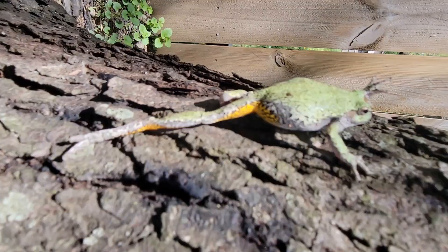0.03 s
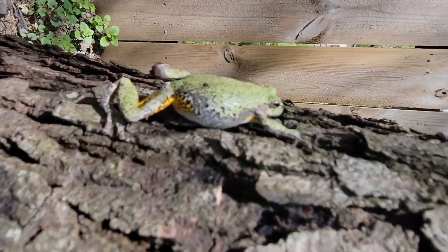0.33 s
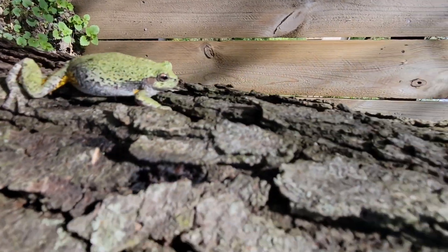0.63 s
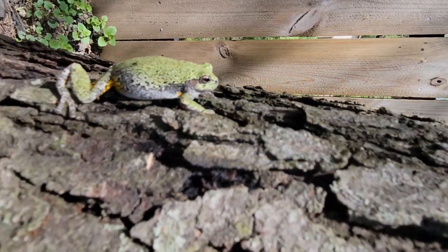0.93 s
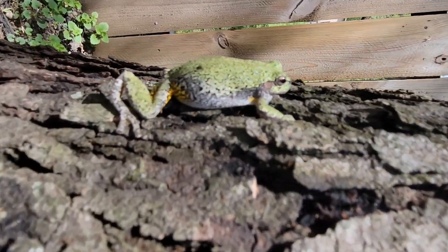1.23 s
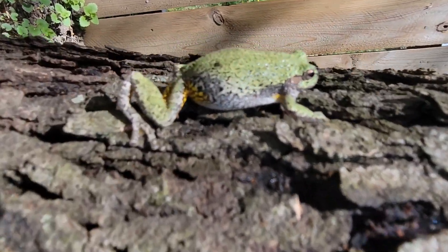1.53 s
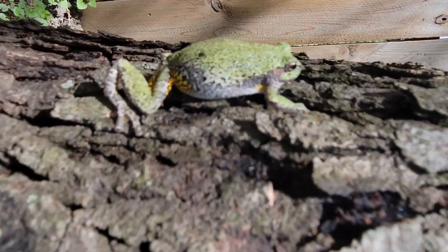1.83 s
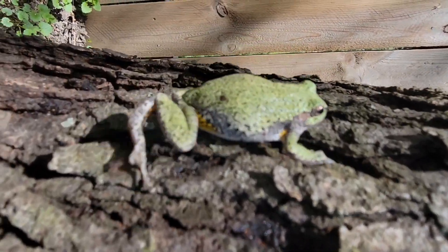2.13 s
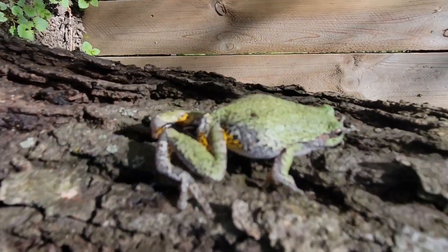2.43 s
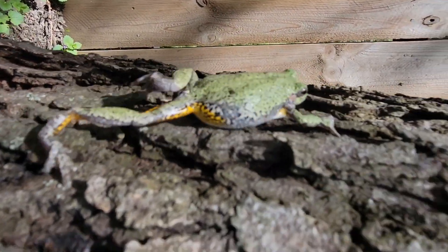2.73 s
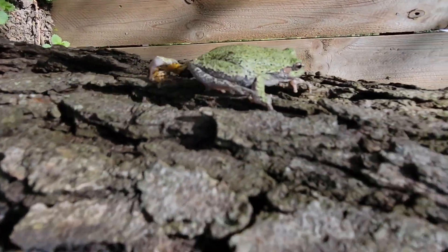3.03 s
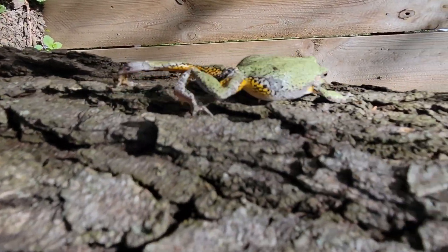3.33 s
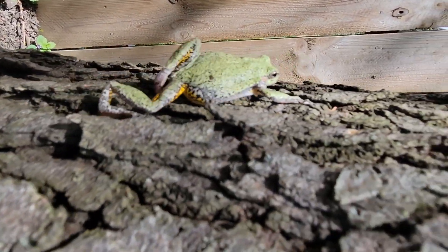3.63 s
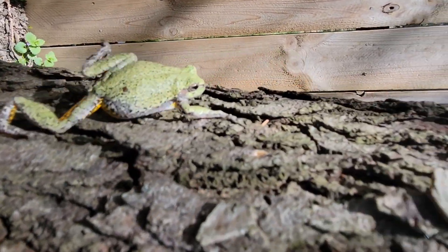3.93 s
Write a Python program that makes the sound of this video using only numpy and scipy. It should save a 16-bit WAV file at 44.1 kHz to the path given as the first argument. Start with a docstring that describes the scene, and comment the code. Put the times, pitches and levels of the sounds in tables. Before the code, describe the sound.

An air conditioner hums steadily in a quiet yard, with far traffic and faint birds.

```python
"""A steady, fluttering hum fills a quiet back yard: a machine behind a fence, probably an air
conditioner, its fan shaking the hum while motor tones beat and the casing softly rattles.
Underneath, a low engine-like drone swells and fades on a bed of distant traffic, and a soft hiss,
perhaps leaves, creeps in. Short chirps, mostly far birds, and one faint, falling whistle echo on the
right. Up close, a hand on the microphone makes a few tiny ticks and one light scuff."""
import sys
import numpy as np
from scipy import signal
from scipy.fft import rfft, irfft
from scipy.io import wavfile

SR = 44100
rng = np.random.default_rng(int(sys.argv[2]) if len(sys.argv) > 2 else 0)


def put_to_file(sound):
    """Save the sound as 16-bit audio at rate SR, in the file named by the first command-line argument."""
    columns = np.atleast_2d(sound).T  # one column per channel
    safe = np.clip(columns, -1, 1)
    whole_steps = np.round(safe * 32767)
    wavfile.write(sys.argv[1], SR, whole_steps.astype(np.int16))


N = 176400
T = np.arange(N) / SR
F = np.arange(N // 2 + 1) * SR / N + 1e-3  # Hz, kept just above zero

# Tone colour of the traffic rumble: frequency_hz, relative_level_db
RUMBLE_SPECTRUM = [(20, -20), (38, -8.5), (55, 2), (78, 5), (110, -4), (170, -6.5), (210, -10), (285, -2.5),
                   (370, -12), (520, -18.5), (740, -23.5), (890, -35), (1100, -35.5), (2000, -55)]
# Airy traffic wash on each side: frequency_hz, left_density_db, right_density_db
WASH_SPECTRUM = [(20, -100, -100), (121, -87, -86.5), (280, -79, -83.5), (560, -83.5, -84.5),
                 (970, -87.5, -89.5), (1410, -91, -89), (2220, -96.5, -93.5), (2860, -95.5, -92),
                 (3487, -101, -101), (4640, -113.5, -123), (5500, -118.5, -129), (7700, -114, -121),
                 (9300, -123.5, -128), (12200, -123.5, -118.5), (15500, -125, -124.5)]
# Swells of the low drone: time_s, level_db
DRONE_SWELLS = [(.08, -38.5), (.42, -37.5), (.8, -45.5), (.97, -48), (1.6, -43), (2.0, -54), (2.3, -42),
                (2.6, -37), (3.1, -43.5), (3.25, -55), (3.42, -40.5), (4, -54.5)]
# Whistles before the echo: start_s, length_s, pitch_hz, slide_hz_per_s, level_db
# The row at 3.35 s is a faint, falling whistle; the others are far birds.
WHISTLES = [(.245, 0.11, 2462, -400, -71), (.35, 0.032, 2444, 2, -66.5), (.395, 0.038, 2870, 1201, -64.5),
            (.438, 0.03, 2890, -1200, -66.5), (.51, .04, 2800, -0.5, -73), (0.651, .04, 2800, 0.5, -74),
            (2.587, .04, 3020, -0.5, -66.5), (2.661, 0.034, 2797, -3000, -61.5), (2.7, .035, 3040, 1, -64),
            (2.762, 0.028, 3010, -0.5, -69), (2.845, .08, 2774, -1800, -67),
            (3.004, 0.041, 2640, -800, -67), (3.215, 0.042, 3070, 0, -66.5),
            (3.258, 0.059, 3060, -300, -56.5), (3.35, 0.11, 2650, -600, -66),
            (3.423, .03, 3050, -1.5, -66.5)]
# Handling ticks: start_s, gain_db, brightness_hz, left_minus_right_db
HANDLING_TICKS = [(.1645, -52, 12500, -1), (.352, -60, 8800, 10), (.889, -56, 13000, -7),
                  (1.216, -50, 13000, -7), (1.257, -57, 13000, -9), (1.798, -65, 11000, 3),
                  (2.206, -59, 13000, -6), (2.234, -53, 13000, -10), (3.274, -60, 13500, 4),
                  (3.4859, -57, 12800, -10), (3.712, -63, 14000, 0), (3.7665, -52, 12800, -7)]
# Steady tones of the motor and casing: pitch_hz, level_db
MOTOR_TONES = [(58.2, -55), (73.5, -51), (80.8, -48.5), (84.5, -60.5), (117.3, -62.5), (147.6, -66),
               (190.6, -56.5), (234.8, -57), (243.3, -57.5), (281.7, -56.5), (293.6, -60.5), (300.9, -66.5),
               (320.1, -60), (448.1, -67), (486.5, -63.5), (495.3, -65), (505.7, -63.5), (525, -65.5),
               (601.8, -76.5), (710.5, -70.5), (719.3, -73), (806.6, -83), (1011.5, -82.5), (1055, -79.5)]

RUMBLE_DB, WASH_SWELL_DB, WASH_FLICKER_DB = -45.5, .4, .55
HISS_HZ, HISS_WIDTH_HZ, HISS_DB, HISS_START_S, HISS_RISE_S = 3213, 397, -67.5, .3, 1.66
DRONE_HZ = 95.15
WHISTLE_WAVER, ECHO_T60_S, ECHO_DB = .013, .8, 1
TICK_DECAY_S, TICK_TAIL_DB, TICK_TAIL_S = .0016, -13, .014
SCUFF_DB, SCUFF_GRIT_DB = -69.5, 2
RATTLE_DB, RATTLE_SWING_DB, RATTLE_CYCLE_HZ = -62, 7.5, 4.8
MOTOR_WAVER_DB = 1.5
HUM_HZ, HUM_DB, FAN_HZ, FLUTTER_DEPTH = 262.4, -39, 22, .1


def undb(db):
    """Decibels to gain."""
    return 10 ** (np.asarray(db) / 20)


def unit(x):
    """Scale to rms 1."""
    return x / np.sqrt(np.mean(x ** 2))


def pan(x, left_db):
    """Place a sound by level: positive leans left, negative right."""
    return x * undb(np.array([[left_db], [-left_db]]) / 2)


def from_left(x, left_db, lag_s=.00014):
    """A sound from the left is louder there and reaches the right a little late."""
    return pan(np.array([x, np.interp(T - lag_s, T, x)]), left_db)


def wander(rate_hz):
    """Smooth random movement of rms 1."""
    return unit(irfft(rfft(rng.standard_normal(N)) / (1 + (F / rate_hz) ** 4), N))


def shaped_noise(hz, density_db):
    """Noise that follows a curve of power per hertz."""
    colour = undb(np.interp(np.log(F), np.log(hz), density_db))
    return irfft(rfft(rng.standard_normal(N)) * colour, N) * np.sqrt(SR / 2)


def resonate(x, hz, width_hz):
    """Pass a sound twice through one broad resonance."""
    return irfft(rfft(x) / (1 + 1j * (F / hz - hz / F) * hz / width_hz) ** 2, N)


def tone(hz, drift_hz):
    """A sine of rms 1 whose pitch wanders."""
    cycles = np.cumsum(hz + drift_hz * wander(.97)) / SR
    return np.sqrt(2) * np.sin(2 * np.pi * (cycles + rng.random()))


def arch(start_s, length_s):
    """A rounded rise and fall."""
    return np.sin(np.pi * np.clip((T - start_s) / length_s, 0, 1))


def traffic():
    """The bed: distant road rumble under a wide, gently moving wash."""
    rumble = undb(RUMBLE_DB) * unit(shaped_noise(*np.array(RUMBLE_SPECTRUM).T))
    hz, left_db, right_db = np.array(WASH_SPECTRUM).T
    wash = np.array([shaped_noise(hz, left_db), shaped_noise(hz, right_db)])
    movement = undb(WASH_SWELL_DB * wander(6.4) + WASH_FLICKER_DB * wander(20))
    return from_left(rumble, left_db=4) + wash * movement


def hiss():
    """A narrow, soft hiss, perhaps far leaves, that fades in and holds."""
    colour = np.exp(-.5 * ((F - HISS_HZ) / HISS_WIDTH_HZ) ** 2)
    band = unit(irfft(rfft(rng.standard_normal((2, N))) * colour, N))
    fade_in = np.clip((T - HISS_START_S) / HISS_RISE_S, 0, 1)
    return pan(undb(HISS_DB) * band * fade_in, left_db=-8.5)


def drone():
    """A low engine-like note that swells and fades."""
    swell = undb(np.interp(T, *np.array(DRONE_SWELLS).T))
    return from_left(swell * tone(DRONE_HZ, drift_hz=.5), left_db=1.5)


def whistles():
    """Short sliding whistles, most of them far birds, blurred by echoes from fences and houses."""
    notes = np.zeros(N)
    for start_s, length_s, pitch_hz, slide, level_db in WHISTLES:
        pitch = pitch_hz * (1 + WHISTLE_WAVER * wander(70)) + slide * (T - start_s - length_s / 2)
        notes += undb(level_db) * arch(start_s, length_s) * tone(pitch, drift_hz=4)
    tail = rng.standard_normal((2, N)) * undb(-60 * T / ECHO_T60_S)
    tail /= np.sqrt(np.sum(tail ** 2, axis=1, keepdims=True))
    echo = signal.fftconvolve(notes[None], tail, axes=1)[:, :N]
    return pan(notes + undb(ECHO_DB) * echo, left_db=-7.5)


def handling_ticks():
    """Thin, close ticks of the hand: each a bright snap of noise with a short soft tail."""
    ticks = np.zeros((2, N))
    for start_s, gain_db, brightness_hz, left_db in HANDLING_TICKS:
        age = np.abs(T - start_s)
        decay = np.exp(-age / TICK_DECAY_S) + undb(TICK_TAIL_DB) * np.exp(-age / TICK_TAIL_S)
        burst = (T >= start_s) * decay * rng.standard_normal((2, N))
        ticks += pan(undb(gain_db) * resonate(burst, brightness_hz, width_hz=4000), left_db)
    return ticks


def hand_scuff():
    """One short, gritty rub of the hand, close to the microphone."""
    grit = undb(SCUFF_GRIT_DB * wander(150)) * rng.standard_normal((2, N))
    rub = unit(resonate(grit, hz=3200, width_hz=1900))
    return pan(undb(SCUFF_DB) * arch(start_s=1.445, length_s=.06) * rub, left_db=-4)


def casing_rattle():
    """The casing rattles softly in an uneven pattern that comes round several times a second."""
    loop_index = (T % (1 / RATTLE_CYCLE_HZ) * SR).astype(int)
    pattern_db = RATTLE_SWING_DB * wander(51)[loop_index]
    variation_db = 2 * wander(14)
    knocks = undb(pattern_db + variation_db) * rng.standard_normal(N)
    body = unit(resonate(knocks, hz=460, width_hz=260))
    return pan(undb(RATTLE_DB) * body, left_db=0)


def machine():
    """The lead: a strong hum shaken by each fan turn, with weaker motor tones beating around it."""
    flutter = 1 + FLUTTER_DEPTH * np.sin(2 * np.pi * FAN_HZ * T)
    hum = undb(HUM_DB) * tone(HUM_HZ, drift_hz=.095) * flutter
    motor = sum(undb(level_db + MOTOR_WAVER_DB * wander(.69)) * tone(pitch_hz, drift_hz=.2)
                for pitch_hz, level_db in MOTOR_TONES)
    return from_left(hum, left_db=1.5) + from_left(motor, left_db=1)


def scene():
    """The yard, mixed from the far background to the machine."""
    background = traffic() + hiss() + drone() + whistles()
    return background + handling_ticks() + hand_scuff() + casing_rattle() + machine()


def record(dry):
    """Snap open after a moment of silence and cut the very top of the treble."""
    open_s, fade_s, top_hz = .078, .00053, 15800
    opened = dry * np.clip((T - open_s) / fade_s, 0, 1)
    return signal.sosfilt(signal.ellip(10, .2, 70, top_hz, fs=SR, output="sos"), opened)


dry = scene()
out = record(dry)
put_to_file(out)
```